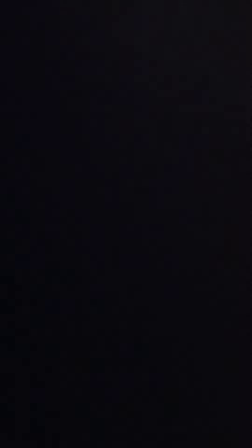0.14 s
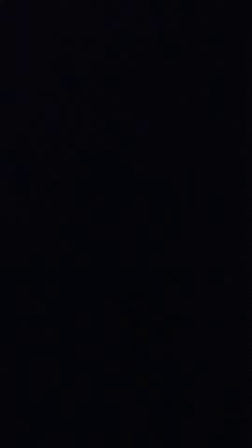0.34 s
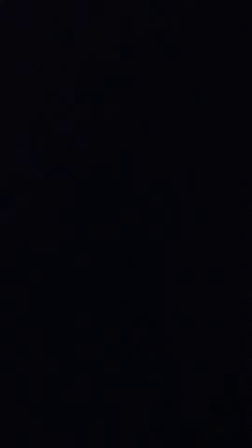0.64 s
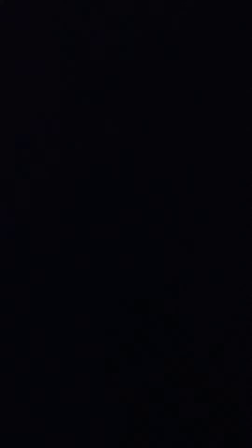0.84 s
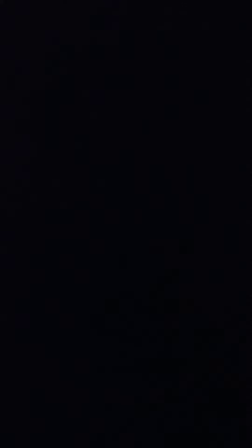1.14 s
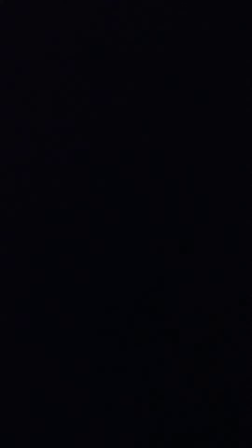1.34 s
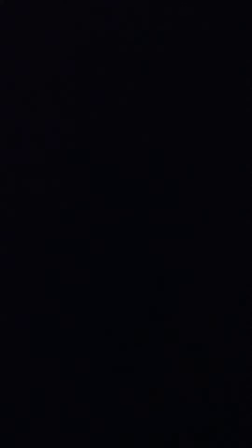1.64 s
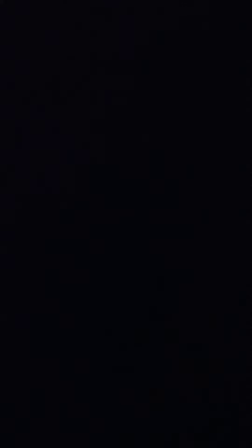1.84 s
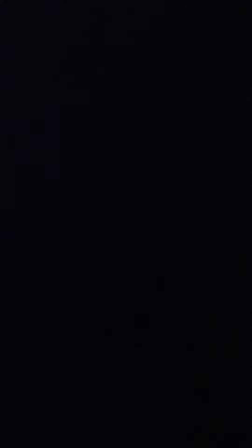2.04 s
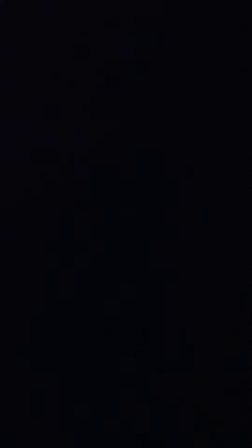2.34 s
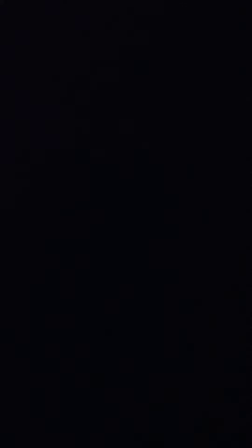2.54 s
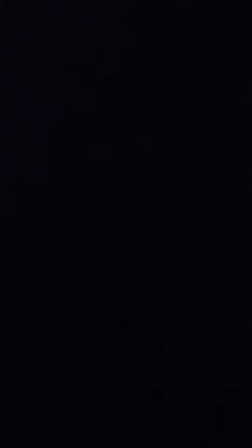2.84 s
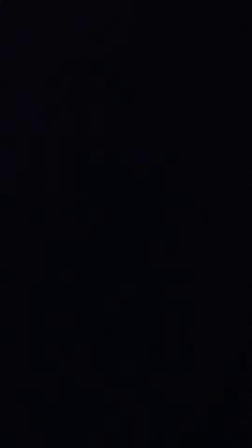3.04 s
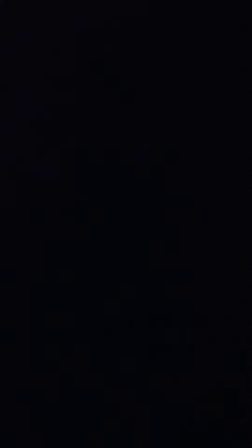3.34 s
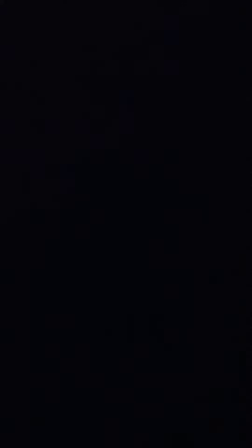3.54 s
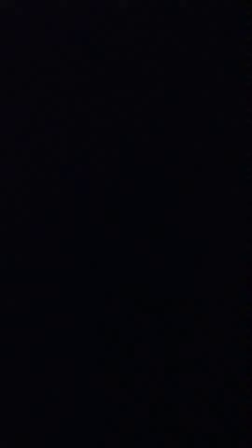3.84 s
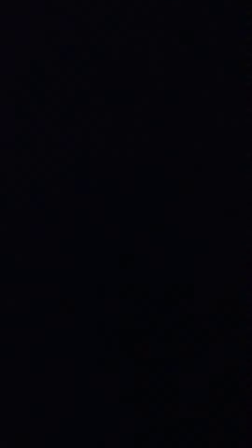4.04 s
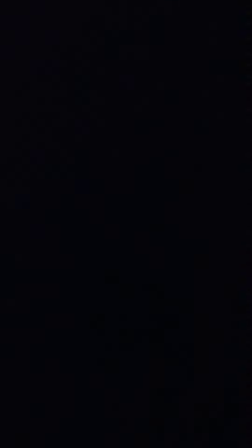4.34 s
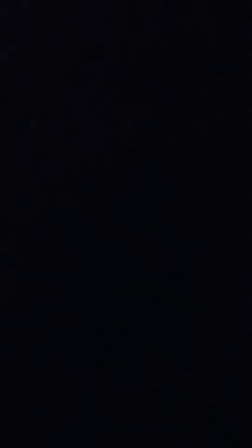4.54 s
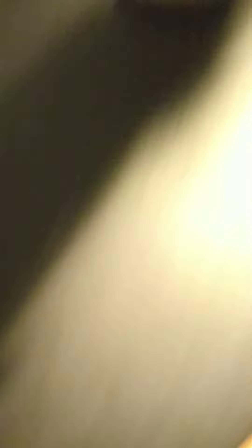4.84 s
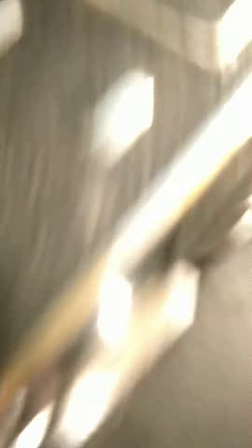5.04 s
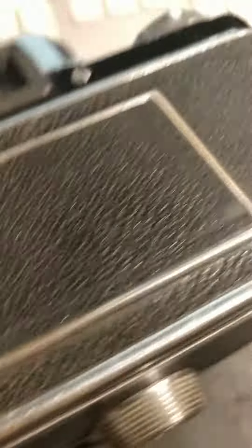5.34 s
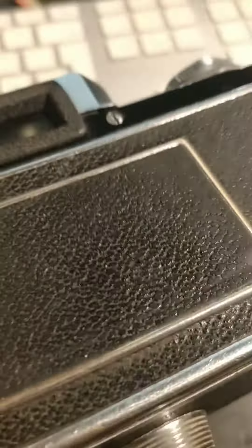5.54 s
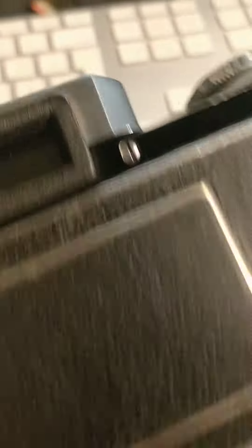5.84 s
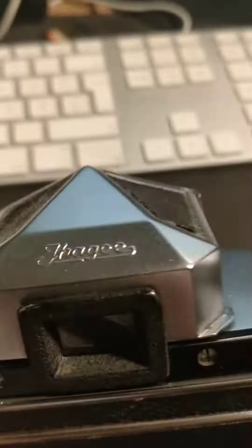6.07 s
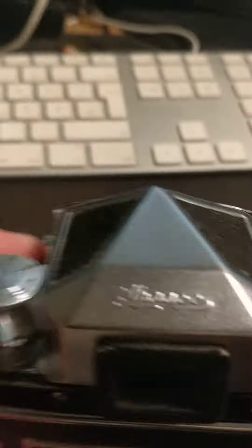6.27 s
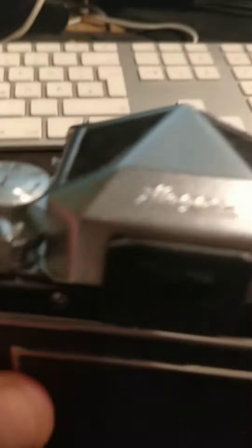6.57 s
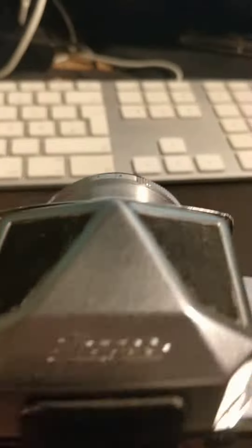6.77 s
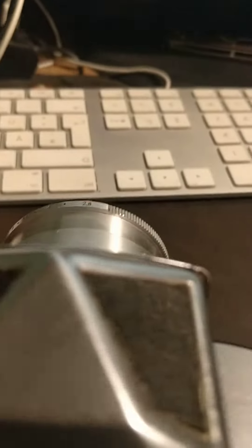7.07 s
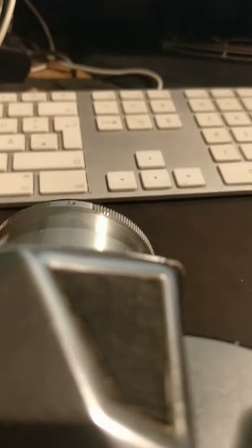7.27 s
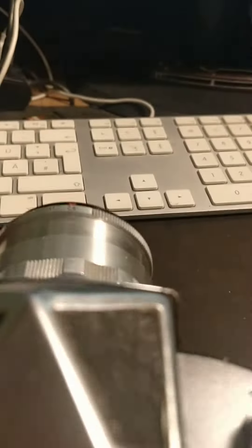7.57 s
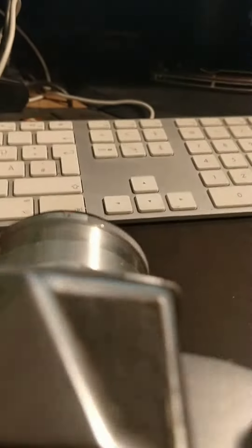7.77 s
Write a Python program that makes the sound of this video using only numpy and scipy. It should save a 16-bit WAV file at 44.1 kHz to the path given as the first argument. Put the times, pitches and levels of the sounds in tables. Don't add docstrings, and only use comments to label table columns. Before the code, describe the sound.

Contact sounds of an old mechanical camera on an indoor desk: a hard tapping cluster, small latch clicks, hollow case knocks and soft rapid ticking. Two snaps follow, the second strongest, with jangling springs. Then gritty skin friction and bumps overload the left microphone, abrupt pops hit the right, and lighter airborne clicks with soft puffs of moving air finish over faint hiss.

```python
import sys
import numpy as np
from scipy import signal
from scipy.fft import rfft, irfft, next_fast_len
from scipy.io import wavfile
from scipy.ndimage import uniform_filter1d

SR = 44100
rng = np.random.default_rng(int(sys.argv[2]) if len(sys.argv) > 2 else 0)


def gain_from_db(level_db):
    decades = np.asarray(level_db, float) / 20
    return 10 ** decades


def master(y):
    cut = np.clip(np.atleast_2d(y).T, -1, 1)
    pcm = np.round(cut * 32767)
    wavfile.write(sys.argv[1], SR, pcm.astype(np.int16))


N = 348831

PORT_LAG = 10
RUB = slice(round(3.9 * SR), round(5.7 * SR))
RUB_SIZE = RUB.stop - RUB.start

# [t/s, hiss level/dB, level on the right port/dB]
SLIDE = [(3.995, -78, -82), (4.012, -60, -71), (4.07, -58, -63.5), (4.08, -46.5, -50), (4.165, -39.5, -38),
         (4.18, -35, -51), (4.22, -31, -42), (4.29, -35, -43), (4.37, -37.5, -57), (4.43, -34, -49),
         (4.46, -38.5, -58), (4.53, -34.5, -43), (4.575, -32, -48), (4.615, -37, -45), (4.672, -35.5, -47),
         (4.698, -46.5, -68), (4.74, -38.5, -55), (4.78, -46, -61), (4.794, -55, -64), (4.81, -46.5, -53),
         (4.87, -43, -56), (4.886, -46, -56), (4.9, -72, -72)]


def along(points, hz):
    f, v = np.transpose(points)
    return np.interp(np.log(hz + 1), np.log(f + 1), v, left=v[0], right=v[-1])


def curves(*tables):
    rows = []
    for table in tables:
        silent = [-110] * (len(table[0]) - 1)
        rows += [(table[0][0] - .02, *silent), *table, (table[-1][0] + .02, *silent)]
    s, *cols = np.transpose(rows)
    return [np.interp(np.arange(N) / SR, s, c) for c in cols]


def filtered(x, response):
    m = next_fast_len(x.shape[-1] + 2048)
    spectrum = rfft(x, m) * response(np.fft.rfftfreq(m, 1 / SR))
    return irfft(spectrum, m)[..., :x.shape[-1]]


def resonances(modes):
    def response(f):
        total = 0
        for k, (center, width, db) in enumerate(modes):
            damping = 1j * f * width
            total = total + (-1) ** k * gain_from_db(db) * damping / (center * center - f * f + damping)
        return total
    return response


def noise(spectrum, grain_db=0, grain_hz=300, size=N):
    knots = rng.standard_normal((2, int(size * grain_hz / SR) + 4))
    place = np.arange(size) * grain_hz / SR
    lumps = np.array([np.interp(place, np.arange(len(k)), k) for k in knots])
    grains = rng.standard_normal((2, size)) * gain_from_db(grain_db * lumps)
    x = filtered(grains, lambda hz: gain_from_db(along(spectrum, hz)))
    return x / np.sqrt(np.mean(x ** 2, axis=1, keepdims=True))


def patchy(x, depth_db):
    z = signal.stft(x, nperseg=256)[2]
    field = uniform_filter1d(uniform_filter1d(rng.standard_normal(z.shape), 5, 1), 4, 2)
    return signal.istft(z * gain_from_db(depth_db * field / field.std()), nperseg=256)[1][:, :x.shape[1]]


def ring(hz, t60, t, attack=0.00013):
    return np.sin(2 * np.pi * hz * t) * gain_from_db(-60 * t / t60) * (1 - np.exp(-t / attack))


def panned(db):
    g = gain_from_db(np.clip(db, -45, 45))
    return np.array([2 * g / (1 + g), 2 / (1 + g)])


def add(out, s, sound):
    view = out[:, round(s * SR):][:, :sound.shape[1]]
    view += sound[:, :view.shape[1]]


def clicks():
    port_taps = [
        (.157, -14, 3940),
        (.1893, -10, 3980),
        (.2027, -13, 4200),
        (.2124, -29, 4370),
        (4.1757, -14, 3300),
        (4.1863, -16, 3100),
        (4.2517, -10.5, 2600),
        (4.5211, -13, 2450),
        (4.3125, -22, 1490),
    ]
    # [t/s, peak level/dB, ring f/Hz]
    crackles = [(4.1095, -38, 7000), (4.2168, -23, 4020), (4.2195, -16, 3500), (4.2225, -21, 2600),
                (4.236, -29, 3900), (4.2635, -31, 1490), (4.282, -25, 1500), (4.4265, -27.5, 3500),
                (4.4415, -28.5, 2500), (4.4743, -27.5, 2910), (4.4837, -24, 1490), (4.4975, -20, 1470),
                (4.5042, -19, 2290), (4.5135, -24, 2800), (4.5556, -24, 3730), (4.5795, -17, 4000),
                (4.5965, -36, 1800), (4.6678, -30.5, 4500), (4.6688, -27, 6000), (4.729, -38, 2800),
                (4.8685, -31, 1500)]
    # [t/s, peak level/dB, ring f/Hz]
    snaps = [(0.1774, -26.5, 3910), (0.677, -21.5, 4550), (1.5449, -30.5, 4700), (1.5707, -23.5, 3900),
             (1.642, -29, 3550), (1.7204, -28.5, 2010), (1.9599, -45.5, 5100), (2.2248, -25.5, 4270),
             (2.2382, -31, 4470), (2.3066, -14.5, 4230), (2.307, -21.5, 2820), (2.3775, -30, 3680),
             (2.2218, -31, 2930), (2.9886, -7, 2810), (2.9892, -7.5, 4280), (2.9908, -7.5, 4910),
             (6.0623, -36, 3000), (6.4299, -19, 3604), (6.7898, -29.5, 1530), (6.8218, -35, 2910),
             (7.0139, -42.5, 4270), (7.288, -49, 5250), (7.572, -51, 7070), (7.8565, -34, 3580)]
    # [t/s, peak level/dB, ring f/Hz]
    rattles = [(0.6137, -59, 1780), (0.646, -46, 5100), (1.7779, -43.5, 3600), (1.9828, -47.5, 2960),
               (2.2175, -33, 3940), (2.3838, -34, 4340), (2.3969, -40, 4260), (2.5838, -49, 5040),
               (2.9854, -19.5, 3000), (3.004, -29, 4737), (3.0133, -27, 4845), (5.5608, -46, 1680),
               (5.9108, -54.5, 1730), (6.3096, -33, 2540), (6.4274, -20, 2610), (6.7241, -45, 5100),
               (6.7698, -34, 3860), (6.7796, -24.5, 5200), (6.8552, -44.5, 4720), (6.9384, -44, 2720),
               (7.1149, -48.5, 3780), (7.8384, -44, 5600)]
    # [t/s, peak level/dB, ring f/Hz]
    bright_clicks = [(.614, -45, 5000), (.647, -44, 10000), (.974, -49, 5000), (.981, -51, 12000),
                     (1.0755, -41, 4000), (1.786, -38, 2800), (1.779, -57, 11000), (1.2565, -45, 4500),
                     (1.2652, -28, 4630), (1.2705, -47, 8500), (1.311, -47, 4500), (1.5665, -47, 12500),
                     (2.2935, -49, 4470), (2.4455, -37, 4300), (2.4495, -33, 6600), (2.9852, -26.5, 8390),
                     (2.9965, -24, 4620), (6.314, -61, 8770), (6.4315, -16, 11100), (6.443, -29.5, 3500),
                     (6.781, -29, 8970)]
    # [f/Hz, width/Hz, level/dB]
    shell = [(1150, 220, 8.5), (2693, 410, 15.5), (4260, 410, 11), (6700, 2600, -15.5), (10400, 3000, -14),
             (12200, 510, -15)]
    # [f/Hz, width/Hz, level/dB]
    far_shell = [(1600, 1200, -3), (2800, 1400, 4), (5000, 1200, 5.5), (9500, 6000, -20.5)]
    # (table, left-right dB, t60 s, ring width over pitch, share of bright edge, dB sent to the room)
    kinds = [(port_taps, 19, .002, .6, .02, .1), (crackles, 20, .0024, .31, .02, -12),
             (snaps, 1.2, .007, .25, .037, -1.7), (rattles, -.7, .027, .3, .032, .1),
             (bright_clicks, 1.3, .0098, .25, .68, -1.5)]
    room_growth = 0.13
    out, blows, t = np.zeros((2, N)), np.zeros(N), np.arange(SR // 16) / SR
    events = [(*row, *kind) for rows, *kind in kinds for row in rows]
    for s, db, hz, pan_db, t60, width, edge, wet_db in events:
        same, own = rng.standard_normal(len(t)), rng.standard_normal((2, len(t)))
        rattle = (same + 1.3 * own) * gain_from_db(-60 * t / t60) * (1 - np.exp(-t / min(.0007, t60 / 8)))
        if t60 < .004:
            rattle[:, round(SR / 2000)] += 9
        body = min(hz / 4300, 1.1) ** 3 * filtered(rattle, resonances(shell))
        sharpness = 2 if hz < 2200 else 1
        own_ring = filtered(rattle, lambda f: resonances([(hz, width * hz, 0)])(f) ** sharpness)
        snap = body + gain_from_db(14) * own_ring
        open_air = s > 5
        bright_edge = rattle - np.roll(rattle, 2, axis=1)
        snap += (edge + 0.25 * open_air) * min(hz / 4000, 1) ** 3 * bright_edge
        snap[1] = np.roll(snap[1], PORT_LAG)
        snap /= np.abs(snap).max(axis=1, keepdims=True)
        add(out, s - .0005, gain_from_db(db) * panned(pan_db)[:, None] * snap)
        blow = gain_from_db(db + wet_db + room_growth * (db + 6.5)) * panned(pan_db)[1] * np.sqrt(t60 * SR)
        blow *= min(hz / 4500, 1) / (1 + 0.5 * open_air)
        at = int(s * 250) * SR // 250
        blows[at] = np.hypot(blows[at], blow)
    return out, filtered(blows, resonances(far_shell))


def springs():
    # [t/s, level/dB]
    spring_snaps = [
        (2.306, -55),
        (2.989, -48),
        (6.428, -54.5),
        (6.778, -67),
    ]
    out, t = np.zeros((2, N)), np.arange(SR // 2) / SR
    for s, db in spring_snaps:
        grains = rng.standard_normal((2, len(t)))
        jangle = filtered(grains, resonances([(8450, 2700, 0), (11700, 3800, 0.0086)]))
        add(out, s, gain_from_db(db + 12.0 - 60 * t / .3) * jangle)
    add(out, 3.04, gain_from_db(-59.0) * np.array([ring(12970, 0.77, t, .05)] * 2))
    return out


def knocks():
    on_port = [(0.1761, -20.5, 353, 0.032), (0.1891, 4, 790, 0.0057), (1.1538, -34, 176, 0.033),
               (1.2031, -35.5, 288, 0.016), (1.955, -35.5, 124, 0.084), (2.9412, -39, 122.3, 0.42),
               (3.0718, -24, 300, 0.0025), (3.2973, -36, 160, 0.033), (3.486, -33.5, 359.5, 0.019),
               (4.003, -51, 1500, 0.011), (4.01, -32, 154, 0.042), (4.0441, -32.5, 120, 0.47),
               (4.1163, -2, 750, 0.005), (4.1146, -8, 195, 0.025), (4.1165, -14, 1300, 0.004),
               (4.495, -16, 670, 0.016), (4.5198, -3, 121, 0.043), (4.5808, -2, 160.5, 0.038),
               (4.5795, -14, 540, 0.025), (4.596, -22, 400, .008), (4.5205, -11, 900, 0.0045)]
    # [t/s, peak level/dB, f/Hz, t60/s]
    near_port = [(0.1892, 0.5, 268, 0.016), (0.6804, -31, 114, 0.14), (0.9828, -37, 139, 0.081),
                 (1.2617, -43, 107, 0.055), (1.617, -33, 94, 0.037), (1.639, -29, 75, 0.027),
                 (2.24, -34.5, 800, .015), (2.225, -39, 700, 0.014), (1.6455, -9.5, 151, 0.027),
                 (1.721, -18.5, 890, 0.0072), (1.7231, -26, 151, 0.046), (1.658, -32.5, 107, 0.18),
                 (1.619, -39, 690, 0.017), (1.5715, -35, 790, 0.015), (2.2073, -48, 266, 0.17),
                 (2.3755, -24, 105, 0.14), (2.322, -36, 420, .04), (2.357, -42, 650, .02),
                 (2.411, -41, 850, .015), (2.461, -40, 800, .02), (2.556, -42, 600, .02),
                 (1.16, -44, 800, .02), (2.4295, -24, 590, 0.012), (2.4335, -18, 138, 0.089),
                 (2.441, -19, 96, 0.048), (2.487, -30.5, 102, 0.2), (2.5988, -39, 131, 0.077),
                 (2.9999, -33, 119.5, 0.26), (3.1142, -32.5, 144, 0.064), (4.0753, -25.5, 127, 0.14),
                 (6.396, -41.5, 480, 0.017), (7.4925, -43.5, 447, 0.013)]
    # [t/s, peak level/dB, f/Hz, t60/s]
    mid_case = [(0.1566, -2.5, 1340, 0.0046), (0.1568, -2, 436, 0.028), (0.2035, 1.5, 328, 0.01),
                (0.2057, -30, 215.5, 0.22), (0.616, -40.5, 586, 0.057), (0.648, -37, 600, 0.046),
                (0.6783, -13.5, 470, 0.0095), (2.3071, -9.5, 708, 0.0099), (2.3785, -12, 135, 0.035),
                (2.5106, -14, 150, 0.012), (2.9897, -10.5, 630, 0.036)]
    # [t/s, peak level/dB, f/Hz, t60/s]
    far_case = [(0.1325, -34, 165.6, 0.07), (3.0388, -35, 607, 0.072), (6.0051, -39, 680, 0.015),
                (6.0626, -25.5, 580, 0.02), (6.0786, -35, 666, 0.018), (6.3095, -22, 600, 0.012),
                (6.3348, -35.5, 663, 0.04), (6.43, -21, 181, 0.076), (6.452, -37, 240, .16),
                (6.695, -42, 450, .015), (6.5074, -30, 570, 0.0093), (6.7256, -29.5, 924, 0.0064),
                (6.7903, -12, 1360, 0.004), (6.843, -29.5, 620, 0.0056), (7.839, -38.5, 783, 0.015)]
    pulls = [
        1.639,
        2.3792,
        4.116,
        4.5198,
    ]
    # [f/Hz, width/Hz, level/dB]
    loose_parts = [(344, 305, -1), (790, 450, -3.5)]
    places = [(on_port, 29), (near_port, 28), (mid_case, 6), (far_case, -.3)]  # (table, left-right dB)
    overtone_db, soft_hz = -4.5, 300
    out, t = np.zeros((2, N)), np.arange(SR // 5) / SR
    low, high = ring(140, 0.035, t, 0.024), ring(238, 0.12, t, 0.02)
    blows = [(*row, pan_db, rows is on_port) for rows, pan_db in places for row in rows]
    shaken = filtered(rng.standard_normal((len(blows), 2, len(t))), resonances(loose_parts))
    for (s, db, hz, t60, pan_db, rebounds), loose in zip(blows, shaken / shaken.std()):
        u = rng.standard_normal(2)
        hardness = min(hz / soft_hz, 1)
        swing = ring(hz, t60, t, 0.29 / hz)
        overtone = ring(2.3 * hz * (1 + 0.1 * u[0]), 0.42 * t60, t, 0.55 / hz)
        swing += gain_from_db(overtone_db) * hardness ** 2 * overtone
        phone = low + gain_from_db(u[1]) * high
        far = np.roll(swing, PORT_LAG) * (-1 if rebounds else 1)
        clatter = gain_from_db(-14.5 - 60 * t / (1.4 * t60 + 0.024)) * (1 - np.exp(-t / .0008)) * hardness * loose
        knock = np.array([swing, far]) + clatter + gain_from_db(-23) * phone
        sign = 1 if np.abs(np.subtract(pulls, s)).min() < 1 / 400 else -1
        add(out, s, sign * gain_from_db(db) * panned(pan_db)[:, None] * knock)
    return out


def pops():
    # [t/s, peak level/dB, f/Hz, t60/s]
    pushes = [
        (4.8908, -8, 300, 0.0069),
        (4.8938, -2, 332, 0.0064),
        (4.8984, -3, 522, 0.0033),
        (4.9055, -0.5, 525, 0.0043),
        (4.909, -14, 700, .003),
        (4.9105, 1.5, 400, 0.0046),
        (4.914, -12.5, 450, 0.0056),
        (4.9176, -5, 259, 0.0084),
        (4.9225, -19, 220, 0.012),
        (4.927, -33, 45, .22),
    ]
    # [t/s, peak level/dB, f/Hz, t60/s]
    sucks = [(4.8605, -26, 70.5, .04), (4.893, -11.5, 600, .003), (4.8963, -4, 646, 0.0028),
             (4.8973, -2.5, 500, 0.003), (4.8995, 3, 250, 0.0036), (4.9066, -11, 200, 0.006),
             (4.9122, -14, 500, 0.0048), (4.9133, -10.5, 650, .003), (4.9162, 0, 330, 0.004),
             (4.921, -2.5, 380, 0.0036), (4.9262, -11, 450, .005)]
    out, t = np.zeros((2, N)), np.arange(SR // 3) / SR
    for sign, rows in ((1, pushes), (-1, sucks)):
        for s, db, hz, t60 in rows:
            jump = ring(hz, t60, t, 0.000094) + 0.18 * ring(3.1 * hz, 0.43 * t60, t, .0001)
            add(out, s, sign * gain_from_db(db) * panned(-56)[:, None] / 2 * jump / jump.max())
    return out


def drag_on_left_port():
    # [start t/s, held t/s, hiss level/dB]
    strokes = [
        (5.214, .034, -52),
        (5.294, .034, -52.5),
        (5.35, .03, -61),
        (5.392, .066, -53.5),
        (5.49, .065, -60.5),
    ]
    # [t/s, level/dB]
    pressure = [
        (3.995, -74),
        (4.04, -39.5),
        (4.15, -37),
        (4.22, -26),
        (4.46, -29),
        (4.6, -29.5),
        (4.67, -56),
        (4.885, -45.5),
        (4.95, -73),
    ]
    # [t/s, level/dB]
    squeak_path = [
        (3.995, -82),
        (4.005, -61.5),
        (4.09, -52.5),
        (4.13, -75),
    ]
    # [f/Hz, level/dB]
    hiss_colour = [(880, -30), (1500, -5), (5220, -8), (13300, -30), (14500, -23), (15400, -68.5),
                   (16000, -88)]
    # [f/Hz, level/dB]
    rasp_colour = [(300, -22), (600, 0.5), (1250, 6), (1800, -28), (3250, -6.5), (5500, -120)]
    # [f/Hz, level/dB]
    rumble_colour = [(12, -47), (25, -6.5), (200, 4.5), (350, -6), (600, -1.5), (900, -5), (1400, -51.5)]
    t, size = (np.arange(N) / SR)[RUB], RUB_SIZE
    hiss_db = curves(SLIDE)[0][RUB]
    for s, held, db in strokes:
        rise, fade = 800 * (s - t), 450 * (t - s - held)
        hiss_db = np.maximum(hiss_db, db - np.maximum(np.maximum(rise, fade), 0))
    rumble_db = np.interp(t, *np.transpose(pressure))
    rasp_db = -10.5 + 0.75 * hiss_db + 0.14 * rumble_db
    hard = np.clip((hiss_db + 56.5) / 25, 0, 1)
    hiss = hard * noise(hiss_colour + [(17000, -120)], grain_db=1.5, grain_hz=70, size=size)
    soft_colour = [(700, -0.5), (1300, 9.5), (5000, -7.5), (16000, -38.0)]
    hiss += (1 - hard) * noise(soft_colour, grain_db=-0.5, grain_hz=500, size=size)
    rasp = noise([(150, -68.5)] + rasp_colour, grain_db=1.5, grain_hz=150, size=size)
    skin = patchy(gain_from_db(hiss_db) * hiss + gain_from_db(rasp_db) * rasp, depth_db=2.5)
    slips = (rng.random((2, size)) < 600 / SR) * gain_from_db(5 * rng.standard_normal((2, size)))
    slips = filtered(slips, lambda f: resonances([(3300, 4000, 0)])(f) ** 2)
    skin += hard * gain_from_db(hiss_db - 10) * slips / slips.std()
    skin += gain_from_db(rumble_db - 5.5) * noise(rumble_colour, grain_db=2.0, grain_hz=90.2, size=size)
    squeak_db = np.interp(t, *np.transpose(squeak_path), left=-120, right=-120)
    squeak_colour = [(3000, -29), (4100, -9), (4700, -6.0), (6500, -26), (9000, -51)]
    skin += gain_from_db(squeak_db) * noise(squeak_colour, grain_db=3.5, grain_hz=100, size=size)
    out = np.zeros((2, N))
    out[:, RUB] = panned(24)[:, None] * skin
    return out


def drag_on_right_port():
    # [t/s, dull level/dB, bright level/dB]
    squeeze = [
        (4.855, -65, -74),
        (4.875, -40, -40.5),
        (4.887, -26, -35),
        (4.892, -30, -57),
        (4.903, -40.5, -60),
        (4.915, -23, -66),
        (4.926, -27.5, -45.5),
        (4.94, -46.5, -46),
        (4.955, -79.5, -83),
    ]
    dull_db, bright_db = [c[RUB] for c in curves(squeeze)]
    slide_db = curves(SLIDE)[1][RUB]
    dull_colour = [(300, 4.0), (1500, 3.5), (5000, -3.0), (9000, -25.0), (16000, -45.5)]
    bright_colour = [(800, -25), (4000, -6), (8500, 0), (12500, -6), (14300, -12), (16000, -40)]
    dull = noise(dull_colour, grain_db=-2.0, grain_hz=500, size=RUB_SIZE)
    bright = noise(bright_colour, grain_db=1.5, grain_hz=200, size=RUB_SIZE)
    skin = gain_from_db(dull_db) * dull + (gain_from_db(bright_db) + gain_from_db(slide_db - 8)) * patchy(bright, depth_db=1.0)
    out = np.zeros((2, N))
    out[:, RUB] = panned(-35)[:, None] * skin
    return out


def grip():
    # [t/s, level/dB]
    holds = [
        [(0, -73.5), (.9, -55), (1.4, -61), (2.6, -62), (3.5, -58.5), (3.7, -71), (4, -72)],
        [(5.6, -71.5), (6.4, -60), (6.8, -61), (7.9, -80.5)],
    ]
    # [f/Hz, level/dB]
    creak_colour = [(25, -26.5), (60, -5.5), (120, 0), (200, -4), (500, -15.5), (900, -45)]
    # [t/s, rms level/dB, half length t/s, bright f/Hz]
    brushes = [(.02, -77, 0.05, 2477), (0.144, -48, .016, 2990), (0.256, -66.5, 0.019, 5070),
               (0.637, -60, 0.025, 6000), (.91, -70, .03, 4500), (1.742, -60, .018, 1890),
               (1.6, -67, .02, 4200), (2.004, -65, .03, 4000), (2.428, -61.5, 0.17, 3880),
               (3.551, -67, 0.067, 6940), (5.083, -64, .012, 3200), (5.232, -60, .012, 4500),
               (5.853, -68.5, 0.084, 10300), (6.249, -59.5, 0.037, 1790), (6.325, -53, 0.028, 2220),
               (7.135, -61, 0.046, 2470), (7.446, -72.5, 0.18, 4520)]
    near_left = np.where(np.arange(N) < 4 * SR, 12, 1.5)
    out = gain_from_db(curves(*holds)[0]) * panned(near_left) * noise(creak_colour, grain_db=6, grain_hz=25)[0]
    for s, db, half, hz in brushes:
        swell = np.hanning(round(3 * half * SR))
        grains = rng.standard_normal((2, len(swell)))
        hush = filtered(grains, lambda f: resonances([(hz, 1.3 * hz, 0)])(f) / (1 + 1j * f / (1.8 * hz)))
        add(out, max(s - 1.5 * half, 0), gain_from_db(db) * swell * hush / hush.std())
    return out


def sway():
    # [t/s, level/dB]
    push = [(0, -73), (4, -71.5), (4.3, -56), (4.62, -48), (4.75, -53), (4.96, -52), (5.08, -59),
            (5.6, -58), (6.0, -66), (6.07, -53), (6.25, -66), (6.45, -50), (6.7, -70), (6.8, -48),
            (7.1, -63), (7.9, -76)]
    colour = [(15, -1.5), (40, -3.0), (90, -11.5), (160, -27.5), (300, -60.0)]
    return gain_from_db(curves(push)[0]) * noise(colour, grain_db=4.5, grain_hz=23.9)


def lens():
    # [t/s, level/dB]
    tick_path = [
        (.5, -65.5),
        (.56, -48.5),
        (1.15, -51),
        (1.3, -48),
        (1.75, -46),
        (1.84, -41.5),
        (1.88, -80),
    ]
    out, t = np.zeros((2, N)), np.arange(SR // 20) / SR
    for s in .541 + np.arange(40) / 30.15:
        db = np.interp(s, *np.transpose(tick_path)) + rng.normal(0, 2.9)
        tick = ring(330 * (1 + .045 * rng.normal()), 0.04, t, 0.0003)
        add(out, s, gain_from_db(db) * panned(36)[:, None] * tick)
    return out


def room(x):
    # [f/Hz, t60/s]
    decay = [(200, .2), (1000, .24), (2500, .29), (5200, .4), (13000, .2)]
    out, size = np.zeros((2, N)), SR // 3
    for start in range(0, N, size):
        hz, t, z = signal.stft(rng.standard_normal((2, SR // 2)), SR, nperseg=256)
        tail = signal.istft(z * gain_from_db(-60 * t / along(decay, hz)[:, None]), SR, nperseg=256)[1]
        tail /= np.linalg.norm(tail[0])
        add(out, start / SR + 0.0041, signal.fftconvolve(x[:, start:start + size], tail, axes=1))
    return out


def air():
    # [f/Hz, level/dB]
    hum_colour = [(12, -28), (20, -2), (113, -23.5), (204, -10), (399, -14), (624, -12.5), (897, -17),
                  (16000, -40)]
    # [f/Hz, likeness from -1 to 1]
    likeness = [(60, -0.54), (380, 0.45), (2380, 0.14), (15000, -0.54)]
    # [f/Hz, level/dB]
    balance = [(60, 0.5), (950, -2.5), (15000, -2.5)]
    turn = lambda hz: np.arccos(np.clip(along(likeness, hz), -1, 1)) / 2
    mid, side = filtered(noise(hum_colour), lambda hz: np.array([np.cos(turn(hz)), np.sin(turn(hz))]))
    ports = np.array([mid + side, mid - side])
    return gain_from_db(-55.5) * filtered(ports, lambda hz: panned(along(balance, hz)))


def scene():
    # [t/s, level/dB]
    gain_path = [
        (0, 6),
        (0.149, -0.5),
        (.3, -9),
        (0.421, -12),
        (.6, -7),
        (1.002, -5.5),
        (4.901, -5.5),
        (5, -13.5),
        (5.202, -6),
        (7.9, -5),
    ]
    metal, blows = clicks()
    gain = gain_from_db(np.interp(np.arange(N) / SR, *np.transpose(gain_path)))
    touch = knocks() + pops() + drag_on_left_port() + drag_on_right_port() + grip() + sway()
    background = gain * (gain_from_db(-14.0) * room(blows[None]) + air())
    return metal + springs() + touch + lens() + background


def band_limit(x):
    return signal.sosfilt(signal.butter(12, 16820, fs=SR, output="sos"), x)


def record(dry):
    # [f/Hz, level/dB]
    mic_top = [(12500, 0), (14300, -4), (15900, -12.5), (16800, -23)]
    ceiling, top_hz = .9, 16800
    held = dry / (1 + np.abs(dry / ceiling) ** 5) ** (1 / 5)
    mix = filtered(held, lambda hz: (hz < top_hz) * gain_from_db(along(mic_top, hz)))
    return band_limit(mix)


dry = scene()
out = record(dry)
master(out)
```